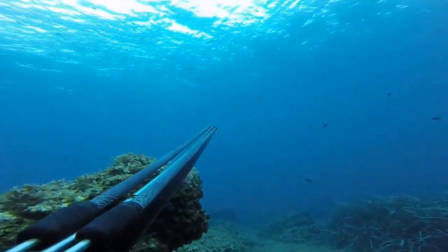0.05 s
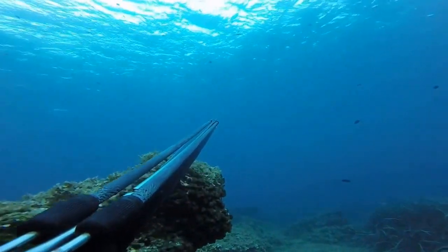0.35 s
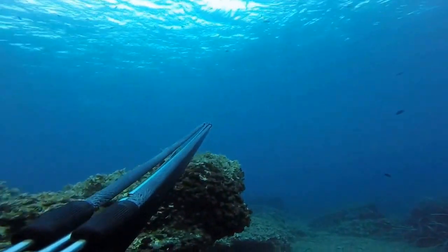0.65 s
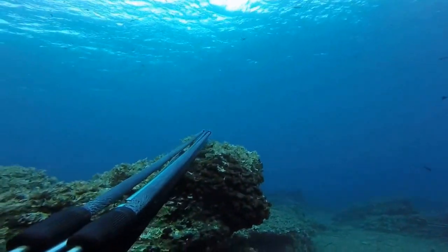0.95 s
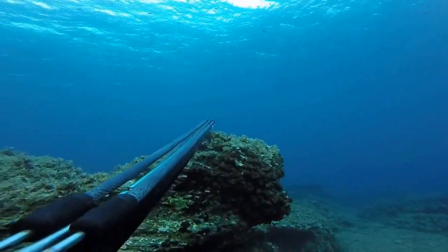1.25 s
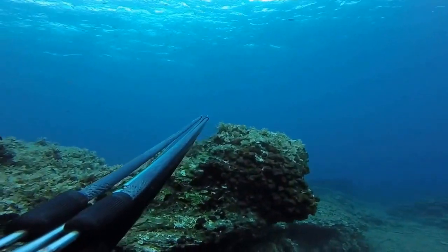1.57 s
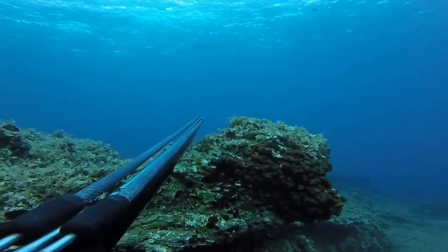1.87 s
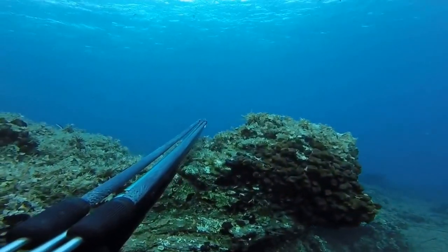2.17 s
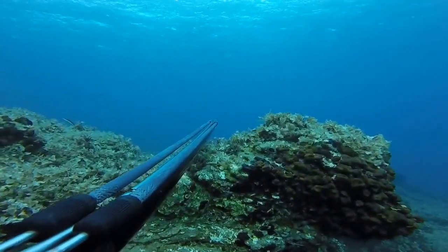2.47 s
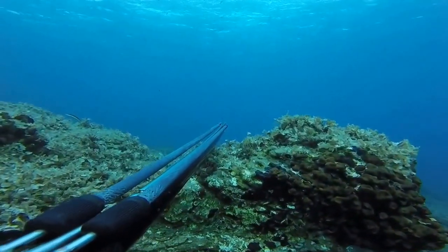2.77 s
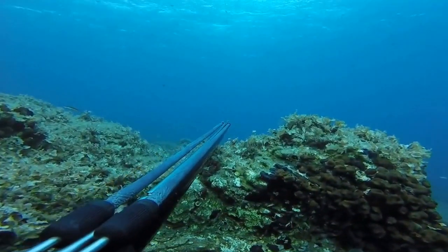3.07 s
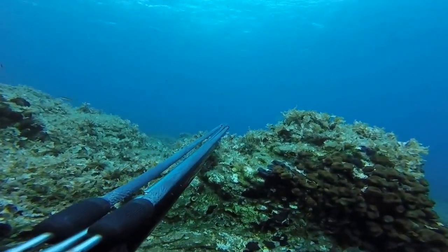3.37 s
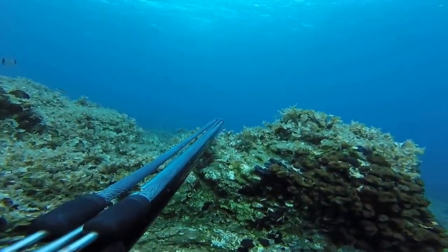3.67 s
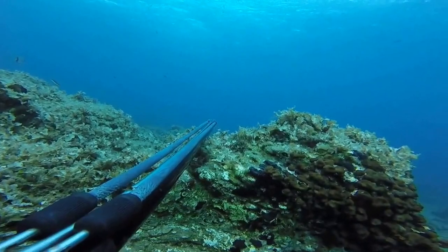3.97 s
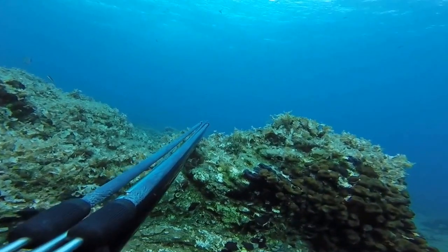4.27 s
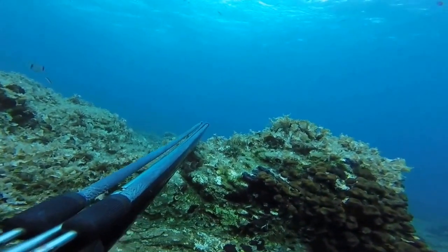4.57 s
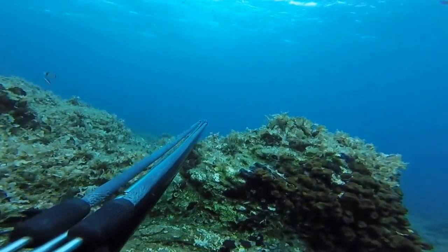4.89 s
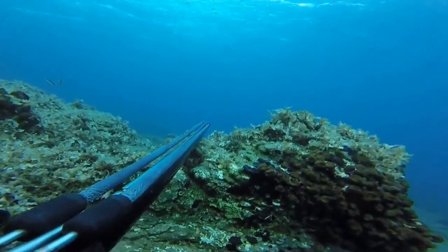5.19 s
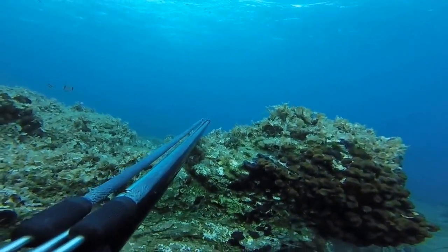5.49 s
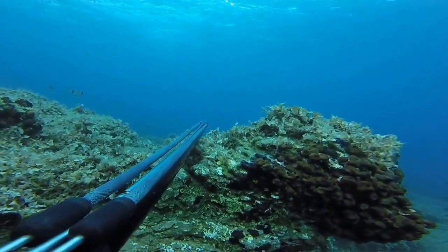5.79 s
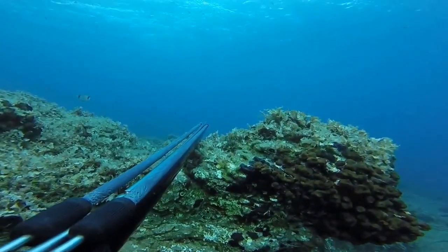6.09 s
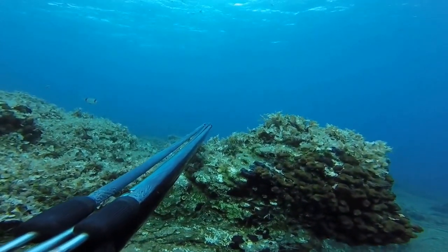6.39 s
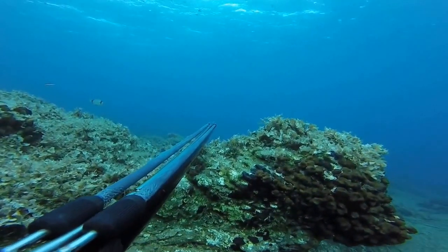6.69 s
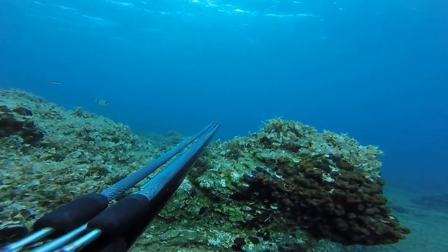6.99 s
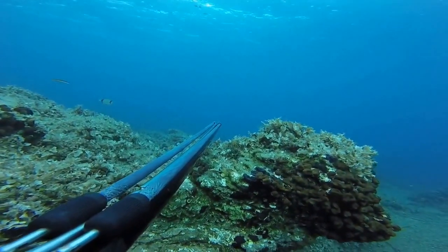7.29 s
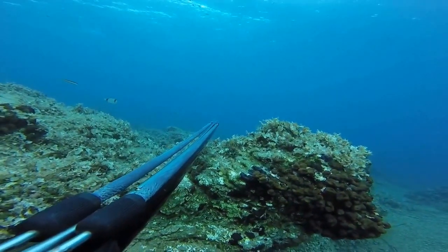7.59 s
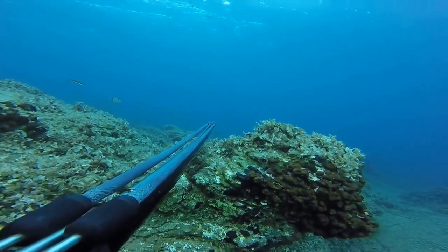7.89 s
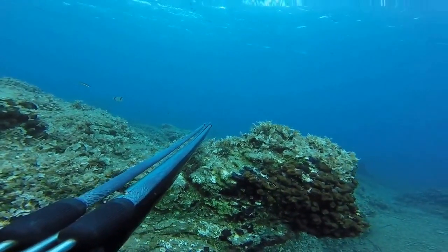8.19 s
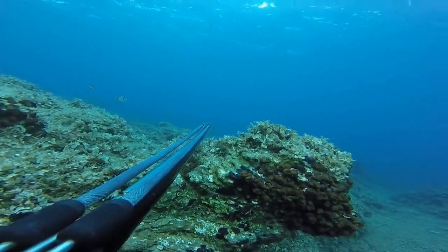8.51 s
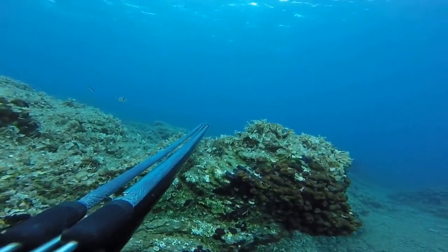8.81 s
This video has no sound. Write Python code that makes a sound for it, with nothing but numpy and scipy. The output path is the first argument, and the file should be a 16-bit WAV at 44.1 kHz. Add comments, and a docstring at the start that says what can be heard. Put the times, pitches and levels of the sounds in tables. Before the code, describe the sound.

Snapping shrimp crackle over a soft underwater rumble, broken by sharp, close knocks and thuds of a speargun hitting rock.

```python
"""A shallow reef, under water; the microphone is in a watertight camera housing riding on a speargun.
Right at the microphone the gun knocks and rubs against rock: barrel and housing ring, a loose fitting
clinks, and shoves set the mount wobbling. Snapping shrimp crackle near and far, each snap a collapsing
bubble, over the rumble of passing water and the wash of the sea. The camera's limiter ducks briefly
after the loudest knocks."""
import sys
import numpy as np
from scipy import signal
from scipy.fft import rfft, irfft
from scipy.io import wavfile
from scipy.ndimage import uniform_filter1d, minimum_filter1d

SR = 44100
rng = np.random.default_rng(int(sys.argv[2]) if len(sys.argv) > 2 else 0)


def put_to_file(sound):
    """Save the sound as 16-bit audio at rate SR, in the file named by the first command-line argument."""
    columns = np.atleast_2d(sound).T  # one column per channel
    safe = np.clip(columns, -1, 1)
    whole_steps = np.round(safe * 32767)
    wavfile.write(sys.argv[1], SR, whole_steps.astype(np.int16))


N = 390267

# gun on rock, right at the microphone: t/s, level/dB, chatter/s, hardness/(dB/octave)
KNOCKS = [(0.392, -47.5, .003, 9.5), (0.9945, -14.5, 0.0016, -4.5), (1.005, -28, 0.00056, 6),
          (1.151, -42, 0.0022, 4.5), (1.374, -44.5, 0.0051, 8), (1.423, -41.5, .0024, 0),
          (3.381, -16, 0.0027, -16.5), (3.388, -14.5, 0.015, 0.5), (3.399, -11, 0.009, -6),
          (3.412, -19.5, .006, -4), (3.423, -13.5, 0.009, 5), (3.446, -23, 0.0028, -10),
          (3.485, -31.5, 0.011, -14.5), (4.395, -41, 0.01, -1), (4.407, -27, 0.014, 0),
          (4.430, -20, 0.0012, -5), (4.442, -12.5, 0.00046, 1.5), (4.471, -25, 0.014, -1.5),
          (5.014, -6.5, 0.0011, -9.5), (5.023, -3.5, 0.0045, 5), (5.039, -7, 0.0076, -0.5),
          (5.057, -21, 0.0022, 13.5), (5.070, -12.5, 0.0087, 3), (5.081, -8, 0.0091, 1),
          (5.104, -23, 0.0051, 5), (5.121, -10, .003, -1), (5.163, -24.5, 0.0039, -10),
          (5.19, -31, 0.048, -17), (5.655, -30.5, 0.0028, 11), (5.678, -29, 0.0027, -1),
          (5.691, -12, 0.0014, 4), (5.705, -16, 0.0063, -4.5), (5.751, -21.5, 0.0035, -1),
          (5.798, -32.5, 0.0035, -9.5), (6.294, -47, 0.00083, 17)]
# low and high modes of barrel and housing: f/Hz, level/dB, t60/s
BODY_MODES = [(207.6, -19.5, 0.086), (309.4, -11.5, 0.054), (348.7, -7.5, 0.12), (398.6, -7.5, 0.07),
              (521.4, -3.5, 0.12), (562, -20.5, 0.019), (688, -14.5, 0.11), (718, 4.5, 0.024),
              (783, 5.5, 0.05), (857, -12, 0.043), (1063, -19.5, 0.13), (1142, -2.5, 0.03),
              (1195, -6.5, 0.066), (1293, -14, 0.085)]
CLACK_MODES = [(1717, -19, 0.038), (1783, -24, 0.075), (1987, -11, 0.021), (2236, 3, 0.025),
               (2251, 3, 0.024), (2370, 6, 0.014), (2588, -2, 0.032), (2791, -3, 0.045),
               (2878, -1.5, 0.053), (3015, -5, 0.024)]
# the many weak resonances between those modes: f/Hz, level/dB
CLATTER_SPECTRUM = [(90, -13.5), (200, -8.5), (400, -0.5), (620, -8.5), (800, 16), (950, -4), (1200, 3),
                    (1550, -10.5), (2300, -28), (3100, -16), (3600, -31.5), (8000, -57)]
# the bright crack of a contact: f/Hz, level/dB
CRACK_SPECTRUM = [(2500, -4.5), (3300, -6), (3800, -5), (4200, 6.5), (4600, -9.5), (5200, -9), (5800, -9.5),
                  (6700, -5.5), (8500, -17), (11000, -24), (15000, -46)]

def knocks(chatter=1.6, tail_db=-22, tail_s=.064, clatter_s=.012, crack_s=.0059):
    """At the microphone: a blow and a short chatter on rough rock ring barrel and housing."""
    out, t = np.zeros(N), np.arange(SR // 4) / SR
    crack = impulse_response(CRACK_SPECTRUM)
    for s, db, chatter_s, hardness in KNOCKS:
        grit, splinters, buzz, rattle = rng.standard_normal((4, len(t)))
        grit *= np.exp(-t / chatter_s)
        buzz *= np.exp(-t / tail_s)  # loose fittings buzz on
        force = (t == 0) + chatter * grit / np.linalg.norm(grit)
        force += amp(tail_db) * buzz / np.linalg.norm(buzz)
        body = ring(struck_spot(BODY_MODES, hardness), .25, mode_ratio=-1.085)
        clack = ring(struck_spot(CLACK_MODES, 0), .25, mode_ratio=-.78)
        clatter = impulse_response([(hz, level + hardness * np.log2(np.clip(hz, 300, 1400) / 700))
                                    for hz, level in CLATTER_SPECTRUM])
        parts = [(-3, force, body),
                 (-3 + .73 * hardness, force, clack),  # a harder contact is brighter
                 (-4.5, rattle * np.exp(-t / clatter_s), clatter),
                 (-19 + .99 * hardness, splinters * np.exp(-t / crack_s), crack)]
        for part_db, drive, response in parts:
            add(out, s, amp(db + part_db) * unit_burst(signal.fftconvolve(drive, response)))
    return out


def struck_spot(modes, db_per_octave, detune=.019, spread_db=2):
    """Every spot on the gun loads and weights the modes a little differently."""
    return [(hz * rng.normal(1, detune),
             db + spread_db * rng.normal() + db_per_octave * np.log2(hz / 700), t60)
            for hz, db, t60 in modes]


# shoves on the mount that carries the microphone: t/s, level/dB, push length/s, rebound/dB
SHOVES = [(0.998, -15, 0.016, -7), (3.381, -6, 0.0063, -14), (3.871, -19, 0.0081, -7),
          (4.385, -8.5, 0.0083, 1), (5.015, -1, 0.004, -7), (5.644, -8.5, 0.013, -1.5)]
# modes of the camera swinging on its mount: f/Hz, level/dB, t60/s
MOUNT_MODES = [(21.1, -13, 0.49), (52.8, -14.5, 0.56), (62, -6.5, 0.35), (66.3, -29, 1.0), (90, -1.5, 0.16),
               (173, 1.5, 0.053)]

def wobble(thud_s=.06, usual_push_s=.0045):
    """Soft half-sine pushes swing the camera; the shorter the push, the more the housing thuds."""
    out, t = np.zeros(N), np.arange(SR) / SR
    swing = ring(MOUNT_MODES, 1)
    thud_spectrum = [(60, -20.5), (100, -13.5), (200, -8.5), (420, -2), (900, -67)]
    for s, db, touch_s, rebound_db in SHOVES:
        pushes = [(s, db, touch_s),  # first touch
                  (s + .0155, db + 3, touch_s * 1.22),  # the weight behind it
                  (s + .092, db + rebound_db, .0139)]  # soft rebound
        for start_s, push_db, push_s in pushes:
            push = np.sin(np.pi * np.minimum(t[:SR // 20] / push_s, 1))
            thud_db = -14 + 4 * np.log2(usual_push_s / push_s)
            thud = amp(thud_db) * noise(thud_spectrum, len(t)) * np.exp(-t / thud_s)
            add(out, start_s, -amp(push_db) * signal.fftconvolve(push / push.sum(), swing + thud))
    return signal.sosfilt(signal.butter(1, 8, "highpass", fs=SR, output="sos"), out)


# a loose metal fitting taps the barrel, close to the microphone: t/s, level/dB
CLINKS = [(1.005, -22.5), (1.073, -32.5), (3.539, -43), (4.512, -37.5), (4.97, -30), (5.198, -47)]
# modes of the fitting: f/Hz, level/dB, t60/s
FITTING_MODES = [(824, -28, 0.09), (1243, -17, 0.064), (2120, -6, .015), (2560, -3, 0.046),
                 (2790, -2, 0.022)]

def clinks(chatter_s=.003):
    """Close by: the fitting chatters for an instant and pings."""
    out, t = np.zeros(N), np.arange(SR // 20) / SR
    ping = ring(FITTING_MODES, .1, mode_ratio=-.87)
    for s, db in CLINKS:
        force = rng.standard_normal(len(t)) * np.exp(-t / chatter_s)
        add(out, s, amp(db) * unit_burst(signal.fftconvolve(force, ping)))
    return out


# strokes of the gun over weedy rock, close to the microphone: t/s, length/s, level/dB
RUBS = [(0.368, 0.068, -43), (0.462, 0.053, -42.5), (0.526, 0.021, -35.5), (0.552, 0.063, -41),
        (0.673, .17, -42.5), (0.994, 0.14, -43), (1.144, 0.031, -35.5), (1.2, 0.051, -46.5),
        (1.286, 0.16, -43), (1.946, 0.13, -53.5), (4.951, 0.066, -42.5)]

def rubs(level_db=-1, slips_per_s=700, clack_db=-13, ends_db=-19):
    """Close by: tiny slips ring barrel and housing as the gun slides; weed cushions the contact."""
    slips = rng.standard_normal(N) * (rng.random(N) < slips_per_s / SR)
    body = ring(BODY_MODES, .5, mode_ratio=-1.025)
    clack = amp(clack_db) * ring(CLACK_MODES, .5, mode_ratio=-.98)
    scrape = signal.oaconvolve(slips, body + clack)[:N]
    weed_spectrum = [(220, 0), (340, 6), (470, 1), (740, 8), (820, 1.5), (1100, -10), (2500, 9.5)]
    pressure = np.zeros(N)
    for s, length_s, db in RUBS:
        arch_db = ends_db * np.linspace(-1, 1, int(length_s * SR)) ** 2
        add(pressure, s, amp(db + arch_db))
    return amp(level_db) * unit(coloured(scrape, weed_spectrum)) * pressure


# low modes of the housing around the microphone: f/Hz, level/dB, t60/s
HOUSING_MODES = [(92, -4.5, 0.043), (237, -13, 0.039), (366, -16.5, 0.032)]

def bump(at_s=8.623, level_db=-34, rise_s=.01):
    """On the housing itself: one soft tap gives a short, dull thump."""
    out, thump = np.zeros(N), ring(HOUSING_MODES, .1)
    onset = np.minimum(np.arange(len(thump)) / SR / rise_s, 1) ** 2
    add(out, at_s, amp(level_db) * unit_burst(thump * onset))
    return out


# snaps of the shrimp nearest the microphone: t/s, level/dB, treble tilt/(dB/octave)
NEAR_SNAPS = [(0.18, -29, -8), (0.3103, -27.5, -4.5), (0.606, -27.5, -8), (0.7066, -31.5, -14),
              (0.7971, -25.5, -0.5), (0.8628, -32, -5), (0.8729, -28, 1.5), (0.9608, -30.5, -7),
              (1.276, -29, -11), (1.8583, -26.5, -3.5), (2.1158, -26, -1.5), (2.391, -30.5, -16),
              (2.5177, -25.5, -2.5), (2.649, -30.5, 9), (2.7522, -31.5, -5), (2.801, -28, -8),
              (3.013, -28.5, -5), (3.3088, -33, -5), (3.6864, -22.5, -21), (4.0027, -28, 3.5),
              (4.3142, -34, -2), (5.328, -33.5, -6.5), (5.384, -26, -3.5), (5.4628, -32, -10),
              (5.593, -26, -2), (5.8851, -23.5, -8.5), (6.295, -30, 0), (6.6496, -28.5, -5.5),
              (6.836, -27.5, -1.5), (6.8616, -25, -6), (7.073, -30, -0.5), (7.137, -28, -2.5),
              (7.5629, -30, -0.5), (7.6166, -31.5, -11), (8.0552, -31.5, -0.5), (8.1627, -27, 7.5),
              (8.2406, -25, 1.5), (8.6036, -30.5, -5), (8.6508, -23, 0.5), (8.802, -33.5, 0)]
# a snap heard from inside the housing: f/Hz, level/dB
SNAP_SPECTRUM = [(700, -42.5), (1700, -18.5), (2100, -1.5), (2650, 3), (3300, -4), (3900, -7), (4900, -5.5),
                 (5350, -4.5), (5750, -14), (6300, -4), (7000, -12), (7700, -7), (9000, -12.5),
                 (10500, -24.5), (15000, -29)]

def near_shrimp(level_db=1, ring_s=.0005):
    """Nearby on the reef: a collapsing bubble clicks and rattles briefly through the housing wall."""
    out, t = np.zeros(N), np.arange(SR // 10) / SR
    for s, db, tilt in NEAR_SNAPS:
        burst = rng.standard_normal(len(t)) * np.exp(-t / ring_s)
        click = signal.fftconvolve(burst, impulse_response(tilted_snap(tilt)))
        click = reef_echo(click, echo_db=-5, decay_s=.0078)
        add(out, s, amp(db + level_db) * click / abs(click).max())
    return out


def far_shrimp(level_db=-56, hiss_db=-61, snaps_per_s=200, bunching=.26, ring_s=.0012, directions=24):
    """Farther off, all around: colonies crackle in loose flurries; the farthest merge into hiss."""
    out, t = np.zeros(N), np.arange(SR // 80) / SR
    flurry = np.exp(bunching * unit(uniform_filter1d(rng.standard_normal(N), size=3000)))
    rate = snaps_per_s * flurry / flurry.mean()
    for tilt in np.linspace(-4, 4, directions):  # the housing colours each direction differently
        spectrum = [(hz, db + rng.normal(0, 2.5)) for hz, db in tilted_snap(tilt)]
        burst = rng.standard_normal(len(t)) * np.exp(-t / ring_s)
        click = unit(np.convolve(burst, impulse_response(spectrum)))
        strength_db = 7.5 * np.minimum(rng.exponential(1, N), 3.12)
        snaps = amp(strength_db) * (rng.random(N) < rate / directions / SR)
        out += signal.oaconvolve(snaps, click)[:N]
    hiss = amp(hiss_db) * noise(SNAP_SPECTRUM)
    return amp(level_db) * unit(reef_echo(out, echo_db=-10, decay_s=.0057)) + hiss


def tilted_snap(db_per_octave):
    """The snap's spectrum, made brighter or duller above 2400 Hz."""
    return [(hz, db + db_per_octave * np.log2(np.clip(hz / 2400, 1, 4))) for hz, db in SNAP_SPECTRUM]


def reef_echo(x, echo_db, decay_s):
    """Seabed and surface scatter each snap into a short tail."""
    t = np.arange(SR // 8) / SR
    taps = rng.standard_normal(len(t)) ** 3 * np.exp(-t / decay_s) * (t > .001)
    return x + amp(echo_db) * signal.oaconvolve(x, taps / np.linalg.norm(taps))[:len(x)]


# slow drift of water right past the housing: t/s, level/dB
DRIFT = [(0.0, -42.5), (0.98, -41), (1.21, -33.5), (1.43, -44.5), (3.13, -52.5), (3.47, -44), (5.35, -31),
         (5.69, -42.5), (6.65, -52), (7.25, -48), (7.59, -52.5), (8.85, -55.5)]
# the rumble of that water: f/Hz, level/dB
FLOW_SPECTRUM = [(8, -7.5), (18, 9), (30, -13), (42, -11.5), (62, -7), (80, -33.5), (130, -29), (300, -74)]

def water_flow(wake_db=-20.5, rise_s=.03, fade_s=.24):
    """Just outside the housing: drifting water rumbles, and each shove stirs up a wake that dies away."""
    t = np.arange(N) / SR
    drift = amp(np.interp(t, *np.transpose(DRIFT)))
    wake = sum(amp(db + wake_db) * np.clip((t - s) / rise_s, 0, 1) * np.exp(-abs(t - s) / fade_s)
               for s, db, _, _ in SHOVES)
    return np.hypot(drift, wake) * noise(FLOW_SPECTRUM)


# the sea all around the microphone: f/Hz, level/dB
SEA_SPECTRUM = [(24, -20), (40, -5), (91, -2.5), (697, -11.5), (1300, -18), (1760, -18), (2500, -18),
                (3740, -74), (5050, -68), (5720, -68), (6330, -56), (7730, -57), (10200, -30.5),
                (14100, -32.5), (16000, -74)]

def sea_wash(level_db=-55, treble_db=-6):
    """In the background: the even wash of the sea, its treble softened."""
    return coloured(amp(level_db) * noise(SEA_SPECTRUM), [(1600, 0), (2200, treble_db)])


def amp(db):
    """Decibels to gain."""
    return 10 ** (np.asarray(db) / 20)


def unit(x):
    """Scales to rms 1."""
    return x / np.sqrt(np.mean(x ** 2) + 1e-20)


def unit_burst(x):
    """Scales a burst so that its loudest 5 ms have rms 1."""
    return x / np.sqrt(uniform_filter1d(x ** 2, 220).max() + 1e-20)


def gains(spectrum, n):
    """Gain of a spectrum of (Hz, dB) points at the bins of an n-point transform."""
    hz, db = np.transpose(spectrum)
    return amp(np.interp(np.log(np.fft.rfftfreq(n, 1 / SR) + 1), np.log(hz), db))


def coloured(x, spectrum):
    """Filters a steady sound by a spectrum."""
    return irfft(rfft(x) * gains(spectrum, len(x)), len(x))


def noise(spectrum, n=N):
    """Steady noise of rms 1 with a given spectrum."""
    return unit(coloured(rng.standard_normal(n), spectrum))


def impulse_response(spectrum, size=1024):
    """The sharpest (minimum-phase) impulse response that has a given spectrum."""
    half = np.log(gains(spectrum, size))
    log_response = signal.hilbert(np.r_[half, half[-2:0:-1]]).conj()
    return np.fft.ifft(np.exp(log_response)).real[:size // 2]


def ring(modes, seconds, mode_ratio=1):
    """Decaying modes, the k-th scaled by mode_ratio ** k; a negative ratio alternates their signs."""
    t = np.arange(int(seconds * SR)) / SR
    return sum(mode_ratio ** k * amp(db - 60 * t / t60) * np.sin(2 * np.pi * hz * t)
               for k, (hz, db, t60) in enumerate(modes))


def add(mix, s, sound):
    """Mixes a sound in at time s."""
    part = mix[max(round(s * SR), 0):][:len(sound)]
    part += sound[:len(part)]


def scene():
    """Everything reaches the microphone through the housing, so both channels are alike."""
    gun = knocks() + clinks() + bump() + wobble() + rubs()
    mono = gun + near_shrimp() + far_shrimp() + sea_wash() + water_flow()
    return np.array([mono, mono])


def record(dry, recovery_db_per_s=14, cutoff_hz=15400):
    """The camera's limiter ducks at peaks over full scale and recovers; a low-pass trims the top."""
    peak_db = 20 * np.log10(abs(dry[0]) + 1e-9)
    recovery_db = np.arange(N) * recovery_db_per_s / SR
    gain_db = np.minimum(recovery_db - np.maximum.accumulate(peak_db + recovery_db), 0)
    gain_db = uniform_filter1d(minimum_filter1d(gain_db, size=100), size=100)  # it looks a moment ahead
    lowpass = signal.firwin(255, cutoff_hz, window=("kaiser", 9), fs=SR)
    return signal.oaconvolve(dry * amp(gain_db), lowpass[None], "same")


dry = scene()
out = record(dry)
put_to_file(out)
```